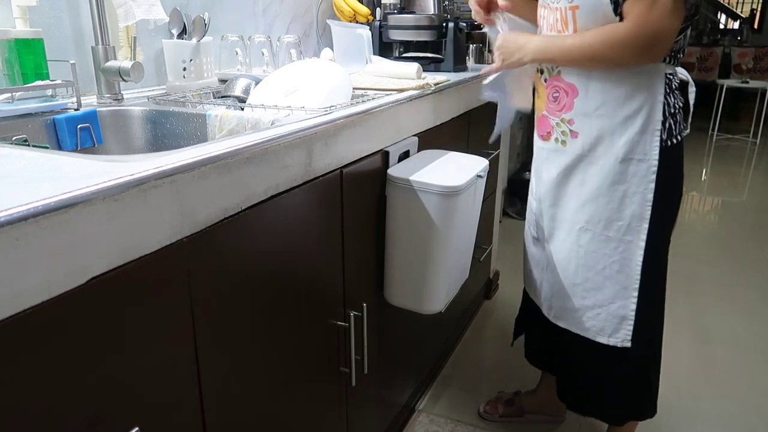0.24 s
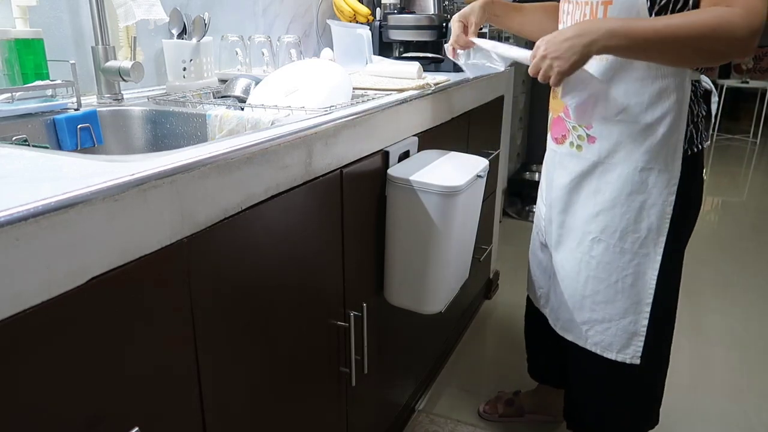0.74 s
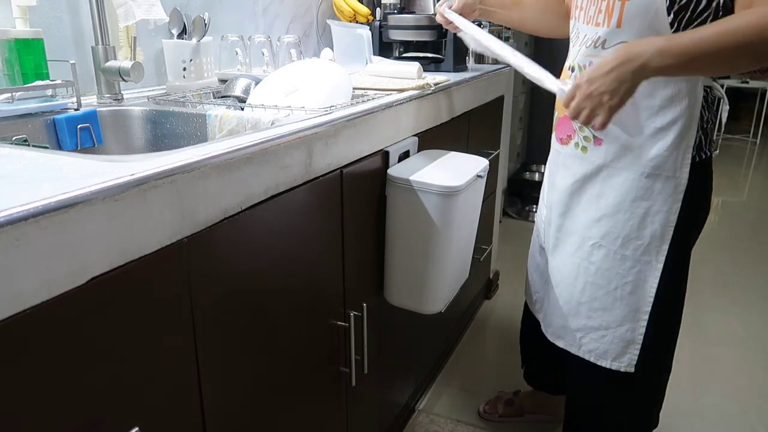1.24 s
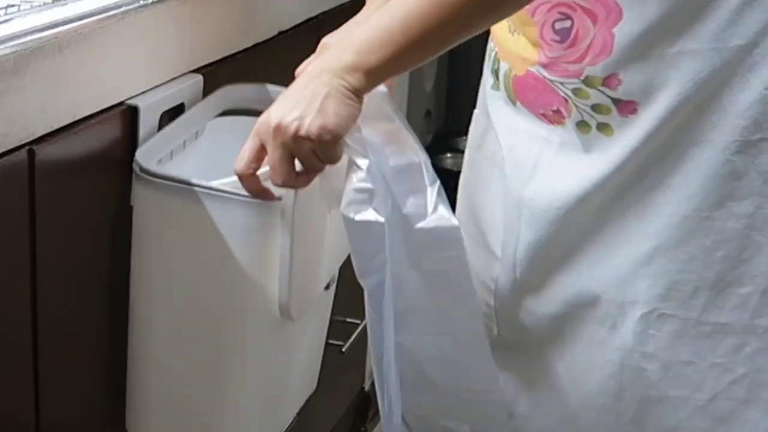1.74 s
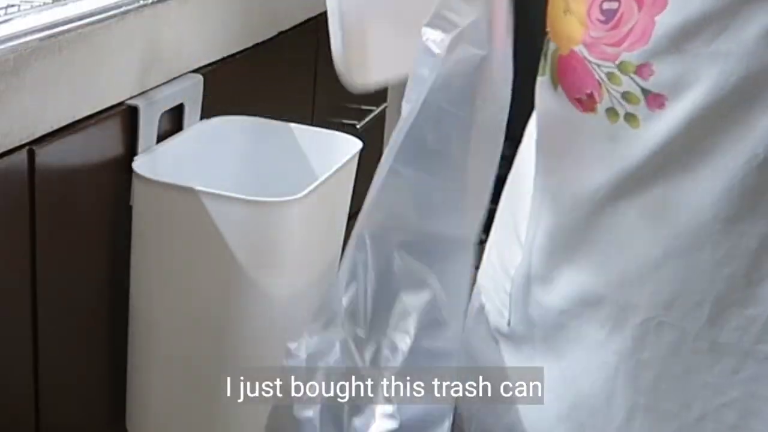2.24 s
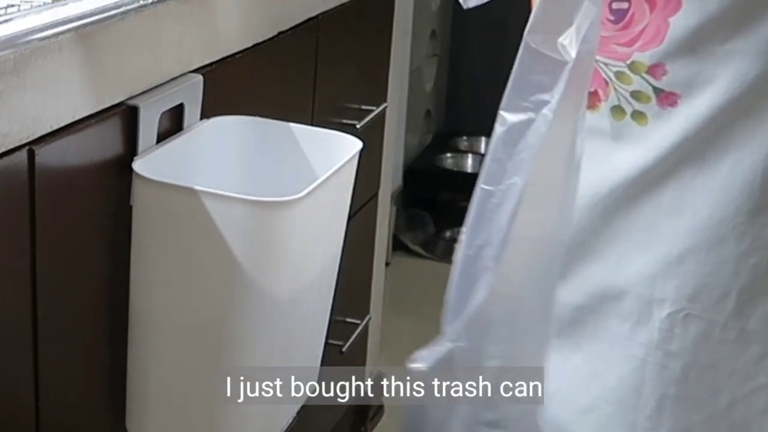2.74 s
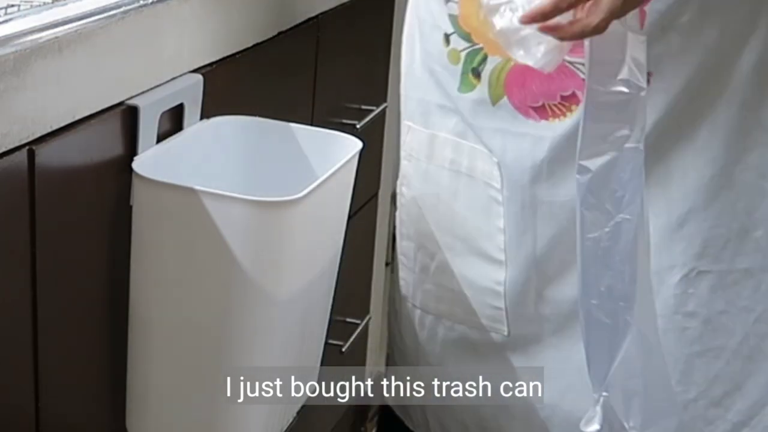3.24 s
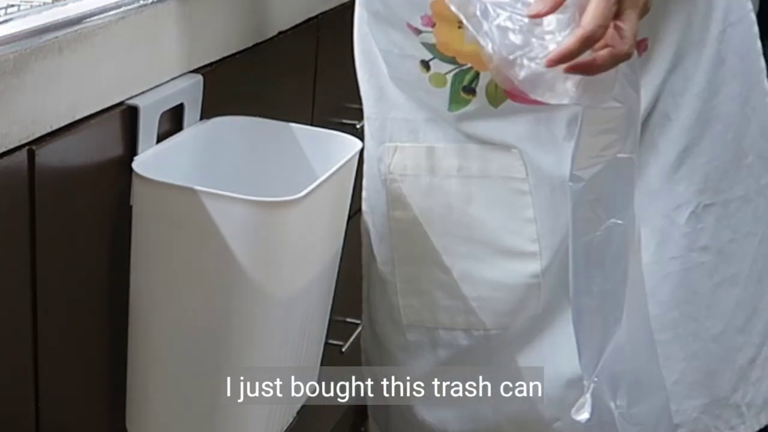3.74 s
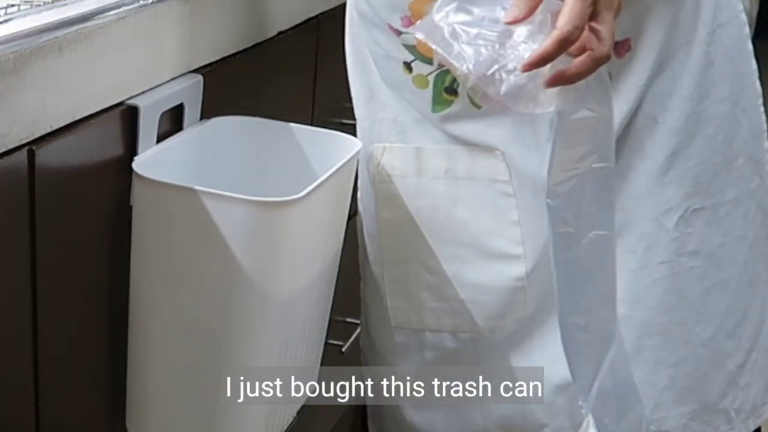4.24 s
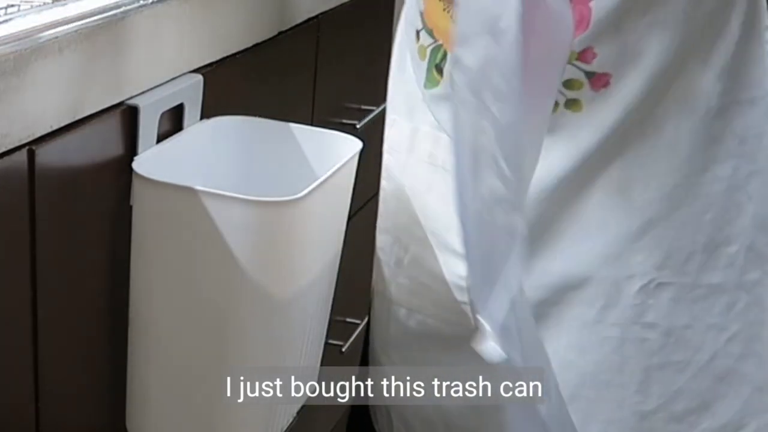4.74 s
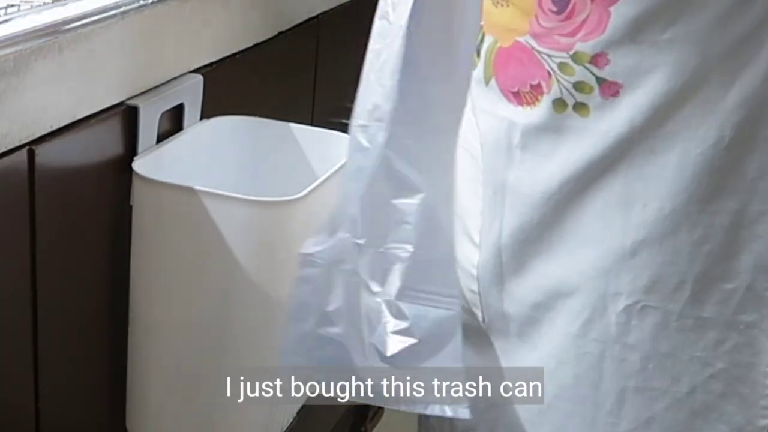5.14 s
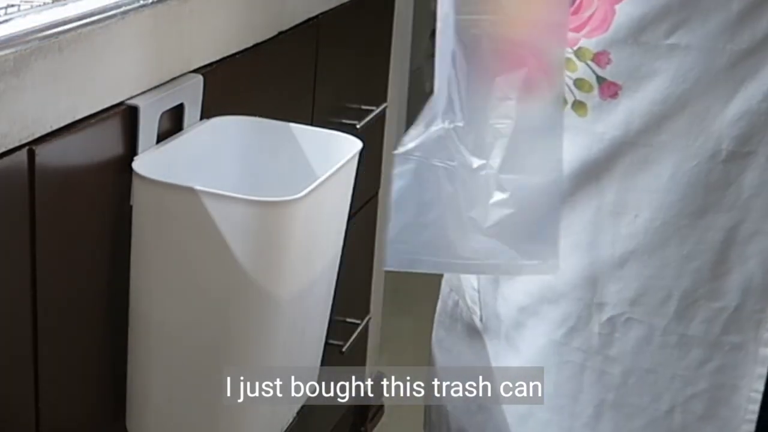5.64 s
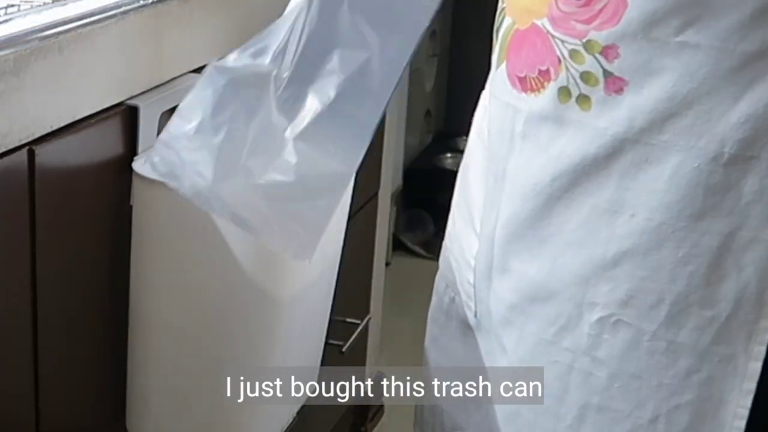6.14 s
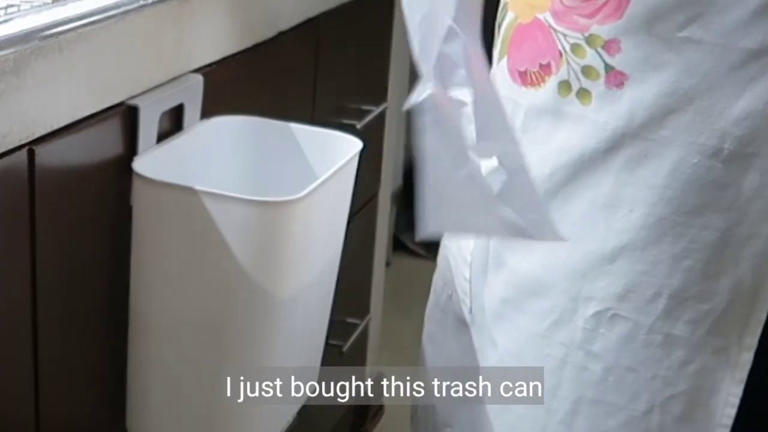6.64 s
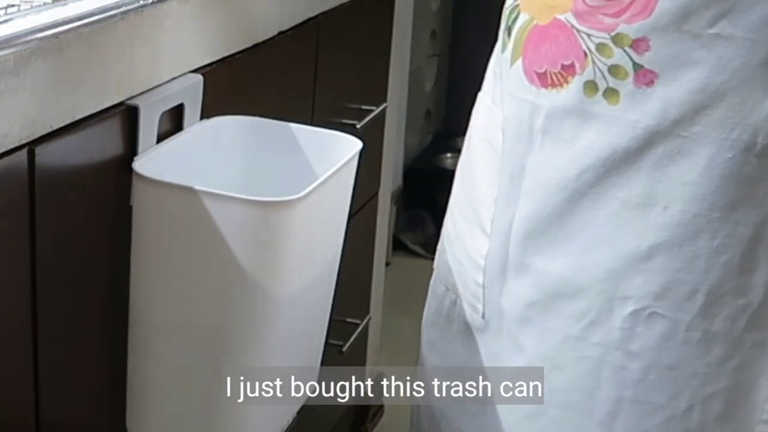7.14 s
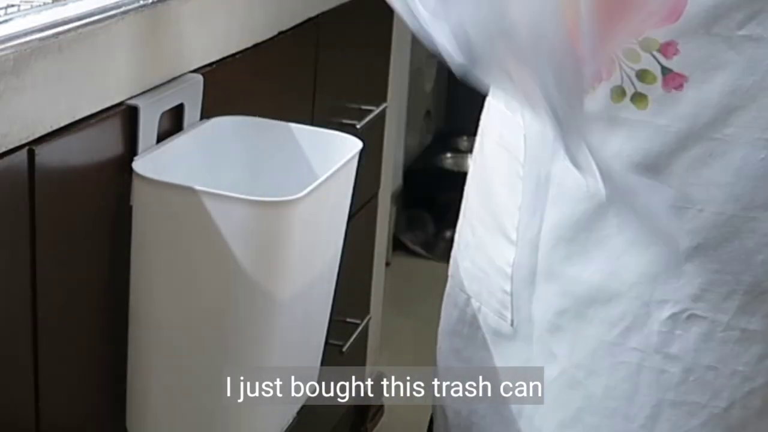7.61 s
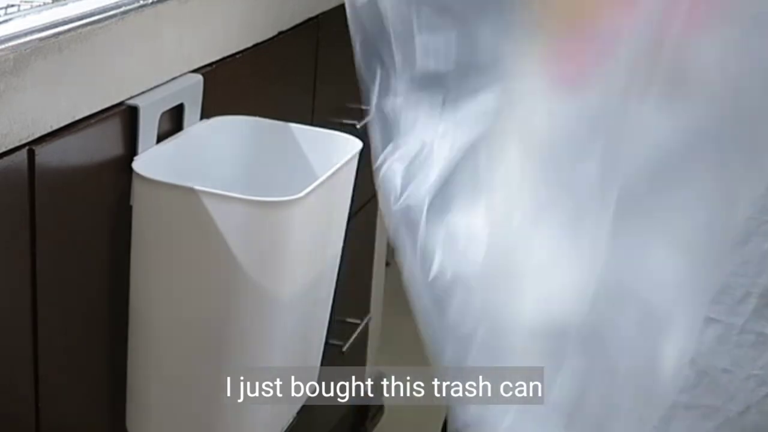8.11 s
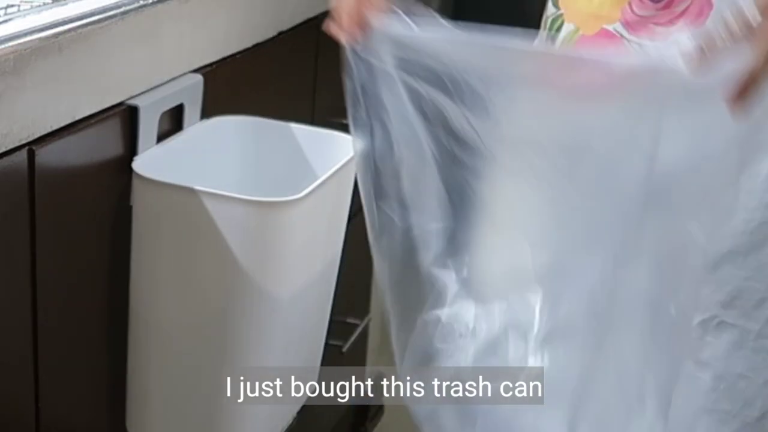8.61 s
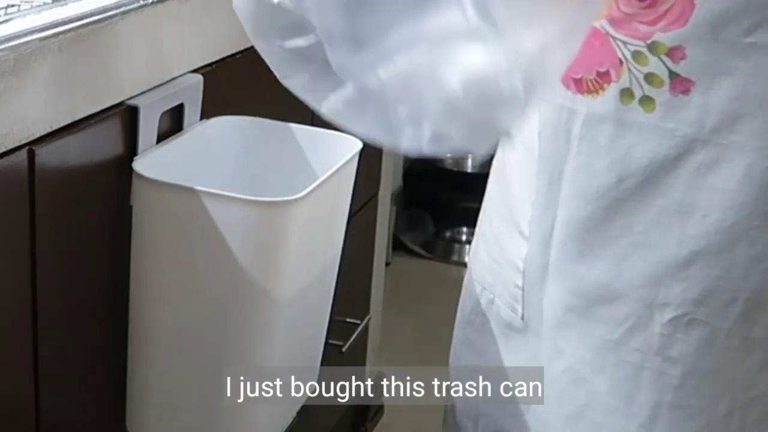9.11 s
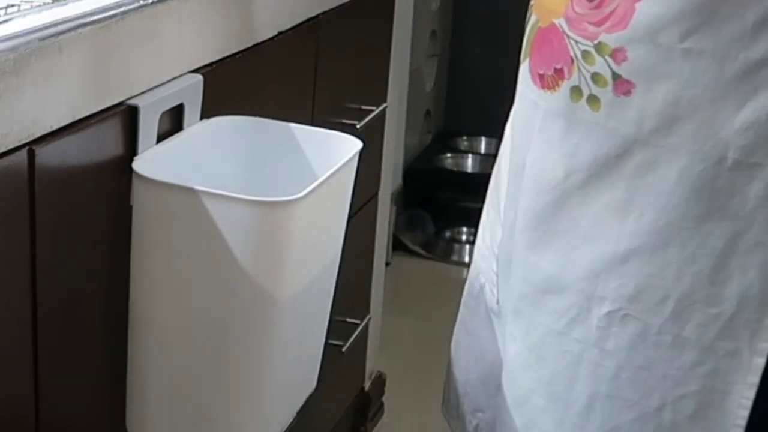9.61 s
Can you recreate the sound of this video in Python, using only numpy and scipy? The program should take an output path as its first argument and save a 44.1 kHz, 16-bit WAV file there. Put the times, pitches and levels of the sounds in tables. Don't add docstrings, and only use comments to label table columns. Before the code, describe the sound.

Crisp plastic film rustling in a hard kitchen, a few booming hollow knocks midway, then bigger flapping shakes over a low fridge hum.

```python
import sys
import numpy as np
from scipy import signal
from scipy.io import wavfile
from scipy.ndimage import uniform_filter1d

SR = 44100
rng = np.random.default_rng(int(sys.argv[2]) if len(sys.argv) > 2 else 0)


def rack_gain(trim_db):
    fader = np.asarray(trim_db, float)
    return 10 ** (fader / 20)


def wav_record(signal):
    frames = np.transpose(np.atleast_2d(signal))
    bounded = np.clip(frames, -1, 1)
    quanta = np.round(bounded * 32767).astype(np.int16)
    wavfile.write(sys.argv[1], SR, quanta)


N = 435266


def unit(x):
    return x / np.sqrt(np.mean(x ** 2, axis=-1, keepdims=True) + 1e-20)


def at_hz(points, hz):
    table_hz, table_db = np.transpose(points)
    return np.interp(np.log(hz), np.log(table_hz), table_db)


def drift(rate):
    r = np.exp(-80 * np.pi * rate / SR)
    slow = signal.lfilter([1], [1, -2 * r, r * r], rng.standard_normal(N // 40 + 2002))[2000:]
    return np.interp(np.arange(N) / 40, np.arange(len(slow)), unit(slow))


def band(x, low_hz, high_hz, order=2):
    return signal.sosfilt(signal.butter(order, [low_hz, high_hz], "band", fs=SR, output="sos"), x)


def ring(start_s, level_db, hz, t60, soft_s):
    first, last = int(start_s * SR), int((start_s + 1.5 * t60) * SR)
    t = np.maximum(np.arange(N) / SR - start_s, 0)[first:last]
    out = np.zeros(N)
    swell = 1 - np.exp(-t / soft_s)
    out[first:first + len(t)] = rack_gain(level_db - 60 * t / t60) * swell * np.sin(2 * np.pi * hz * t)
    return out


def resonance(x, hz, width_hz):
    r = np.exp(-np.pi * width_hz / SR)
    return signal.lfilter([(1 - r * r) / 2, 0, (r * r - 1) / 2], [1, -2 * r * np.cos(2 * np.pi * hz / SR), r * r], x)


def kitchen(x, wet_db, side_direct_db):
    t = np.arange(int(.6 * SR)) / SR
    fade = rack_gain(-60 * t / 0.42) * (t > .003)
    tails = unit(rng.standard_normal((2, len(t))) * fade) / np.sqrt(len(t)) * rack_gain(wet_db)
    slope = rack_gain(side_direct_db)
    tails[:, :3] = [[0, 1, 0], [slope, 0, -slope]]
    return signal.fftconvolve(x[None], tails, axes=1)[:, :N]


BANDS = 28 * 2 ** (np.arange(21) * .455)


def coloured(mid_side, gain_db, apart):
    out = 0
    for k, (low, high) in enumerate(zip(BANDS, BANDS[1:])):
        hz = np.sqrt(low * high)
        mid, side = band(mid_side[k % 2], low, high)
        side = side * rack_gain(at_hz(apart, hz))
        out = out + rack_gain(gain_db(hz)) * np.array([mid + side, mid - side])
    return out


# peak_s, crackle_db, rise_s (per 10 dB), fall_s (per 10 dB), crispness_db
UNFOLDING_MOVES = [(.13, -52, .03, .2, -15), (.49, -34.5, .105, .23, -16.5), (.77, -37.5, .035, .27, -9),
                   (1.01, -44, .15, .25, -15), (1.25, -47, .08, .4, -17), (1.41, -36, .006, .02, -30),
                   (1.53, -48, .15, .08, -11), (1.67, -42.5, .025, .04, -11), (1.78, -55, .02, .2, -13),
                   (1.83, -43, .03, .065, -30), (1.96, -47.5, .07, .2, -25), (2.07, -48, .04, .08, -12),
                   (2.105, -50, .03, .025, -10), (2.27, -52, .05, .12, -12), (2.75, -57, .05, .25, -13),
                   (3.48, -60, .02, .06, -11), (3.73, -57, .03, .03, -12), (3.87, -55, .05, .15, -13),
                   (4.76, -57, .3, .15, -4)]
OPENING_MOVES = [(5.01, -38, .075, .25, -7), (5.24, -33.5, .03, .03, -22), (5.34, -37.5, .04, .09, -10),
                 (5.57, -39, .3, .09, -8), (5.76, -36, .12, .17, -10), (6.12, -34, .14, .25, -7),
                 (6.24, -38, .08, .06, -7), (6.3, -29, .04, .1, -14), (6.57, -33.5, .05, .1, -9),
                 (6.63, -27.5, .035, .08, -6), (6.88, -39, .35, .12, -7), (7.06, -41, .08, .2, -7),
                 (7.16, -29, .07, .085, -11)]
SHAKING_MOVES = [(7.42, -31, .03, .2, -11), (7.48, -27, .09, .09, -8), (7.525, -27, .06, .03, -7.5),
                 (7.62, -31.5, .1, .15, -8), (7.69, -33, .03, .08, -10), (7.82, -37, .1, .06, -13),
                 (8.022, -15.5, .045, .06, -12), (8.25, -27, .19, .055, -8.5), (8.38, -34, .2, .4, -10),
                 (8.53, -19, .065, .12, -12), (8.58, -20.5, .06, .06, -11), (8.73, -28, .2, .09, -11),
                 (8.93, -37, .3, .4, -9), (9.12, -31, .08, .12, -10), (9.22, -28, .12, .057, -9),
                 (9.41, -41, .15, .05, -10), (9.57, -34, .06, 0.9, -9), (9.748, -22, .018, .1, -11),
                 (9.79, -20, .05, .046, -14)]
# start_s, steady_rustle_db, billow_db (of a move against its crackle)
SHEET_AT_REST = [(0, -52, -10), (.3, -54, -12), (1.2, -58, -7), (2.3, -58.5, -7), (3.4, -62, -5),
                 (4.45, -54, -8), (5.4, -52, -19), (6.1, -50, -13), (7.3, -48, -13), (8.6, -47, -11),
                 (9.4, -49, -15), (9.66, -49, -14), (9.75, -49, -2), (9.87, -49, -13)]


def handling():
    t = np.arange(0, N, 32) / SR
    start_s, rest_db, billow_db = np.transpose(SHEET_AT_REST)
    rest_db, billow_db = np.interp(t, start_s, rest_db), np.interp(t, start_s, billow_db)
    all_moves = np.vstack([UNFOLDING_MOVES, OPENING_MOVES, SHAKING_MOVES])
    peak_s, peak_db, rise_s, fall_s, crisp_db = all_moves.T[:, :, None]
    drop_db = 10 * np.maximum((peak_s - t) / rise_s, (t - peak_s) / fall_s)
    moves = rack_gain(2 * (peak_db - drop_db))
    stir = rest_db + 54
    crackle = moves.sum(axis=0) + rack_gain(2 * rest_db)
    crisp = (moves * rack_gain(2 * crisp_db)).sum(axis=0) + rack_gain(2 * (rest_db - 17 + .9 * stir))
    billow = moves.sum(axis=0) * rack_gain(2 * billow_db) + rack_gain(2 * (rest_db - 1 - .5 * stir))
    return [np.interp(np.arange(N) / SR, t, 10 * np.log10(power)) for power in (crackle, crisp, billow)]


def creases(per_s, spread_db, clump_db):
    part = rng.integers(0, 3, N)
    born = rng.random(N) < per_s / SR
    size_db = spread_db * np.minimum(rng.exponential(1, N), 4) + clump_db * drift(57)
    clicks = born * rack_gain(size_db) * rng.choice([-1, 1], N)
    return unit(sum(kitchen(clicks * (part == k), wet_db=1.5, side_direct_db=-12) for k in range(3)))


def patches(per_s, width_hz):
    pitches, dealt = np.geomspace(1200, 3500, 16), rng.integers(0, 16, N)
    snaps = (rng.random(N) < per_s / SR) * rack_gain(4.2 * np.minimum(rng.exponential(1, N), 3)) + 1e-18
    rings = sum(resonance(snaps * (dealt == k), hz, width_hz) for k, hz in enumerate(pitches))
    return unit(kitchen(rings, wet_db=-2.0, side_direct_db=-6)[0])


# pitch_hz, level_db (per Hz)
FILM_TONE = [(71, -22), (120, -9.5), (173, -4.5), (204, -4.5), (390, -2.5), (574, -2.5), (844, -5),
             (954, -7), (1290, -6), (2430, 1.5), (5700, -9), (12300, -16.5), (15400, -16)]
# pitch_hz, side_minus_mid_db
FILM_WIDTH = [(60, -20), (110, -25), (200, -48), (380, -42.5), (700, -19), (1290, -14), (2380, -22.5),
              (4400, -2), (8120, 2.5), (15000, 3.5)]


def bag():
    crackle, crisp, billow = handling()
    trains = [creases(per_s=2500, spread_db=4.0, clump_db=2.3) for _ in range(2)]
    fold_db = crackle - 5 + np.minimum(crackle + 48, 0)
    folds = rack_gain(fold_db) * patches(per_s=120, width_hz=110)

    def gain_db(hz):
        high = np.interp(np.log(hz), np.log([2500, 8000]), [0, 1])
        low = np.interp(np.log(hz), np.log([500, 1800]), [1, 0])
        level = (1 - high - low) * crackle + high * (crisp + 9) + low * (billow + 11)
        return at_hz(FILM_TONE, hz) + level + 12.0 + 0.97 * drift(31)
    return coloured(trains, gain_db, FILM_WIDTH) + folds


# pitch_hz, width_hz, level_db
BIN_AIR = [(563, 44, -15.5), (971, 22.5, -5.5), (1140, 30, -13.5), (1528, 45, -13.5)]
# start_s, level_db
NEAR_BIN_MOUTH = [
    (0, -6),
    (4.9, -4),
    (5.1, 15),
    (6.5, 1),
    (7.5, -6),
    (8.0, -9),
    (9.87, 7.5),
]


def bin_echo(film):
    near = rack_gain(np.interp(np.arange(N) / SR, *np.transpose(NEAR_BIN_MOUTH)))
    crackle = film.mean(axis=0)
    return near * sum(rack_gain(db + 7.5) * resonance(crackle, hz, width_hz) for hz, width_hz, db in BIN_AIR)


# pitch_hz, level_db (per Hz)
HUM_TONE = [(15, -38), (25, -12), (59, -0.5), (125, -5.5), (151, -16), (188, -3), (297, -9), (358, 0),
            (432, -13), (468, -17.5), (720, -14), (846, -24.5), (1570, -14), (1950, -25), (15400, -52)]
# pitch_hz, side_minus_mid_db
HUM_WIDTH = [(60, -31), (110, -13.5), (200, -7.5), (380, -7), (700, -0.5), (1290, -9.5), (2380, -2),
             (4400, -2), (8120, 0), (15000, 5)]
# start_s, level_db
LOW_HUM_LEVEL = [(0, 1.5), (1, 0.5), (2.3, -0.5), (4, -1), (6.8, -1), (8.4, 2), (8.6, -9), (9.87, -9.5)]
# pitch_hz, level_db (rms)
FRIDGE_TONES = [(60, -70), (120, -56), (357, -55), (415, -63), (560, -65), (715, -62)]


def hum():
    t = np.arange(N) / SR
    swell_db = np.interp(t, *np.transpose(LOW_HUM_LEVEL))

    def gain_db(hz):
        return at_hz(HUM_TONE, hz) + 0.46 * drift(3.4) + swell_db * (hz < 230)
    noise = coloured(rng.standard_normal((2, 2, N)), gain_db, HUM_WIDTH)
    tones = sum(rack_gain(db + 5.0 * drift(10)) * np.sin(2 * np.pi * hz * t) for hz, db in FRIDGE_TONES)
    return rack_gain(-47) * unit(noise) + tones


# start_s, pitch_hz, level_db
FAR_MOTOR = [
    (0.0, 101, -43),
    (0.086, 107, -37),
    (0.1, 105, -56),
    (0.12, 102, -37),
    (0.312, 90.0, -42),
    (0.638, 93.0, -50),
    (0.708, 98.6, -50),
    (0.9, 92.5, -53),
]


def drone():
    t = np.arange(N) / SR
    start_s, hz, level_db = np.transpose(FAR_MOTOR)
    fade_db = -60 * np.maximum(t - start_s[-1], 0) / .4
    turns = np.cumsum(np.interp(t, start_s, hz)) / SR
    return rack_gain(np.interp(t, start_s, level_db) + fade_db + 3) * np.sin(2 * np.pi * turns)


# start_s, peak_db, pitch_hz
CREASE_TICKS = [(0.0312, -34.5, 1940), (0.0597, -35.5, 2630), (0.0705, -39.3, 2020), (0.1008, -36.1, 2200),
                (0.108, -29.2, 2840), (0.1192, -30.4, 2970), (0.1745, -34.3, 2500), (0.2281, -38.5, 1590),
                (0.2873, -40.5, 2540), (0.3196, -34.4, 2330), (0.3539, -31.7, 3190), (0.3839, -29.6, 2580),
                (0.4035, -29.8, 2280), (0.4306, -26.6, 2670), (0.584, -26.5, 2020), (0.5902, -26.3, 1980),
                (0.6751, -27.5, 2410), (0.6923, -30.0, 2840), (0.7037, -31.6, 3140), (0.7538, -25.5, 2370),
                (0.7611, -24.1, 2450), (0.8451, -28.0, 2540), (0.8522, -27.2, 2410), (0.9284, -27.3, 2630),
                (0.9489, -29.1, 2410), (0.9563, -30.5, 2800), (0.9882, -26.9, 2630), (1.0198, -25.0, 2540),
                (1.0252, -30.2, 1720), (1.0488, -29.2, 2200), (1.0816, -31.1, 1980), (1.1841, -27.9, 1890),
                (1.2413, -34.9, 2500), (1.2923, -33.1, 1640), (1.3034, -34.9, 1420), (1.3621, -34.9, 2760),
                (1.409, -21.8, 2330), (1.4151, -27.1, 2540), (1.4241, -31.6, 2280), (1.4308, -31.3, 2280),
                (1.4917, -32.6, 2630), (1.5181, -30.2, 2540), (1.571, -35.2, 1810), (1.6039, -38.8, 2370),
                (1.8198, -31.8, 2070), (1.8335, -32.6, 1810), (1.8427, -36.2, 1810), (1.8662, -37.5, 1770),
                (1.9988, -35.0, 2280), (2.0116, -33.8, 2240), (2.2677, -39.0, 1510), (2.5203, -43.6, 2540),
                (2.7686, -41.3, 2450), (3.161, -44.8, 1590), (3.1793, -44.7, 1680), (3.2623, -44.5, 1550),
                (3.6756, -44.6, 1720), (3.7249, -41.4, 1810), (4.7046, -37.0, 2020), (4.8839, -38.0, 2200),
                (4.9247, -34.4, 2450), (5.1007, -27.9, 2450), (5.224, -23.3, 1680), (5.2326, -21.4, 1460),
               (5.3373, -24.1, 2450), (5.5036, -28.0, 2580), (5.7686, -25.1, 1940), (5.7762, -22.7, 3060),
               (5.8194, -29.0, 2410), (5.8843, -27.8, 1770), (6.0137, -25.9, 2710), (6.1028, -23.9, 2240),
               (6.1147, -22.3, 2500), (6.2782, -22.4, 2710), (6.3675, -19.5, 3060), (6.5282, -26.4, 2630),
               (6.5456, -25.2, 2800), (6.6231, -19.2, 2500), (6.7514, -26.0, 2580), (6.816, -26.3, 2800),
               (6.8851, -26.7, 2760), (7.0367, -28.7, 2840), (7.0704, -27.2, 2930), (7.1404, -20.2, 2580),
               (7.3014, -28.1, 2630), (7.3819, -26.0, 3190), (7.4135, -18.6, 2540), (7.4509, -16.2, 3750),
               (7.4983, -15.6, 1720), (7.6147, -19.5, 2110), (7.6228, -19.2, 2710), (7.6974, -18.3, 1720),
               (7.7489, -24.5, 2410), (7.9892, -13.2, 2840), (7.9972, -11.5, 2410), (8.0135, -9.5, 2930),
               (8.0258, -4.9, 2410), (8.057, -9.4, 2280), (8.2625, -18.4, 1850), (8.2696, -17.4, 1940),
               (8.4817, -15.6, 2540), (8.5198, -9.6, 2630), (8.5349, -8.9, 2410), (8.5748, -8.7, 2020),
               (8.5828, -10.3, 2330), (8.602, -12.5, 1980), (8.6672, -19.1, 2070), (8.7752, -19.0, 1980),
               (8.8035, -23.8, 2370), (8.8443, -25.4, 2410), (8.854, -24.7, 2840), (8.8674, -25.9, 2630),
               (9.0314, -24.3, 2840), (9.097, -20.5, 2330), (9.1282, -18.4, 2110), (9.2664, -23.4, 1980),
               (9.3041, -26.1, 2410), (9.5272, -28.9, 2670), (9.7733, -11.8, 1640), (9.8173, -16.2, 2450)]


def ticks():
    rows = np.array(CREASE_TICKS)
    out, t = np.zeros(N), np.arange(400) / SR
    edges = band(rng.standard_normal((len(rows), 400)), 2200, 6000)
    for (start_s, peak_db, hz), edge in zip(rows, edges):
        snap = rack_gain(1.5 - 60 * t / .009) * np.sin(2 * np.pi * hz * t) + rack_gain(-60 * t / .006) * edge
        out[int(start_s * SR):int(start_s * SR) + 400] += rack_gain(peak_db) * snap
    return out


# start_s, peak_db, pitch_hz, t60_s (time to die by 60 dB)
HOLLOW_BUMPS = [(.06, -38, 82, .2), (0.498, -42, 204, 0.34), (1.822, -31, 255, 0.12),
                (1.83, -32, 320, 0.18), (1.84, -33.5, 192, 0.13), (1.85, -34, 400, .1),
                (1.875, -30, 330, .08), (1.865, -29, 250, .12), (2.059, -38, 335, 0.16),
                (3.93, -22, 228, .3), (4.116, -17, 192, .15), (4.121, -26.5, 46.6, .5),
                (4.135, -21, 255, .15), (9.741, -31, 107, 0.17), (9.752, -26, 156, .15)]
# start_s, peak_db, pitch_hz, t60_s
FOLD_TWANGS = [(.425, -36, 1790, .15), (.49, -35, 2520, .12), (.56, -37, 1815, .2), (1.407, -30, 3390, .06),
               (5.243, -30, 1165, .12), (5.228, -32, 575, .08), (6.286, -28, 1900, .07),
               (6.291, -24, 945, .08), (6.293, -24, 3300, .06), (6.308, -29, 1240, .06),
               (6.357, -23, 945, .1), (6.36, -25, 2980, .07)]


def bumps():
    return sum(ring(start_s, peak_db, hz, t60, 0.0018) for start_s, peak_db, hz, t60 in HOLLOW_BUMPS + FOLD_TWANGS)


# start_s, peak_db, pitch_hz, t60_s, rasp_db
CREASE_POPS = [(0.106, -38, 2820, 0.044, -5), (0.49, -28, 1860, 0.062, 4), (0.588, -27, 1810, 0.055, -12),
               (0.75, -30, 2550, 0.065, -1), (0.838, -28, 2510, 0.05, -8), (1.184, -31.5, 1680, 0.066, -1),
               (1.291, -33, 1210, 0.053, -18), (1.408, -28, 2410, 0.05, -16), (1.429, -35, 2370, 0.042, -6),
               (1.515, -35, 2440, 0.045, -6), (1.82, -31, 1800, 0.054, -19), (2.011, -34.5, 2520, 0.05, -2),
               (5.223, -28, 1390, 0.042, -13), (5.23, -19, 1430, 0.05, -16), (5.249, -31, 1160, 0.056, -6),
               (5.334, -26, 3440, 0.05, -15), (5.378, -21, 2350, 0.029, -10), (6.114, -23, 2420, 0.05, -6),
               (6.129, -26, 2550, 0.046, 0), (6.293, -20, 970, 0.05, -12), (6.31, -22, 2530, 0.05, 4),
               (6.363, -21, 2940, 0.068, -1), (6.375, -19, 2420, 0.041, -2), (8.572, -13.5, 1990, 0.12, -5)]


def pops():
    out, noise = np.zeros(N), rng.standard_normal((len(CREASE_POPS), 4000))
    t = np.arange(4000) / SR
    for (start_s, peak_db, hz, t60, rasp_db), slips in zip(CREASE_POPS, noise):
        patch = .6 * unit(resonance(slips, hz, width_hz=77)) + 1.1 * np.sin(2 * np.pi * hz * t)
        rasp = rack_gain(rasp_db) * unit(band(slips, 900, 5000))
        shape = rack_gain(peak_db - 4 - 60 * t / t60) * (1 - np.exp(-t / 0.0014))
        out[int(start_s * SR):int(start_s * SR) + len(t)] += shape * (patch + rasp)
    return out


# start_s, cabinet_boom_db, lid_ring_db, rim_ring_db, crack_db
LID_KNOCKS = [
    (3.896, -4.5, -33, -31, -19.5),
    (3.943, -10, -52, -57, -50),
    (3.984, -27.5, -42, -34, -22),
    (3.989, -30, -18.5, -40, -17),
    (4.021, -17, -40, -54, -32),
    (4.077, -35, -38, -45, -30),
    (4.114, -9, -28, -11.5, -14),
    (4.155, -7, -40, -30, -35),
    (4.241, -26, -37.5, -30, -25.5),
    (4.279, -15.5, -47, -50, -56),
]
# pitch_hz, level_db, t60_s
CABINET_RINGS = [(132, -4, 0.033), (144.2, -8, 0.49), (164.8, 0.5, 0.12), (210.9, -4, 0.12),
                 (298, -10.5, 0.078)]
LID_RINGS = [(447, 0, 0.25), (590, -6, 0.13), (795, -3, 0.5), (840, 1, 0.07), (948, 0, 0.18),
             (1290, 1, 0.074), (1675, -6, 0.1), (2226, -3, .05), (3200, -7, .07)]
RIM_RINGS = [(535, 2, 0.14), (595, -4, .25), (710, -1, 0.09), (877, -6, 0.054), (953, -1, 0.09),
             (1100, -6, .08), (1210, -12, .15), (1650, -8, 0.16), (2140, 4, 0.031), (2750, -6, .05),
             (3300, -16, .07)]


def knocks():
    out, t = np.zeros(N), np.arange(N) / SR
    crack, tail, click = np.zeros((3, N))
    rattle = [1 + .22 * drift(45) for _ in range(5)]
    for start_s, boom_db, lid_db, rim_db, crack_db in LID_KNOCKS:
        bodies = [(CABINET_RINGS, boom_db - 4, .005), (LID_RINGS, lid_db - 2.5, .002), (RIM_RINGS, rim_db - 6.5, .002)]
        for body, share_db, soft_s in bodies:
            for hz, mode_db, t60 in body:
                out += rattle[int(hz) % 5] * ring(start_s, share_db + mode_db, hz, t60, soft_s)
        since = np.clip(t - start_s, 0, 1)
        crack += rack_gain(crack_db + 2.5 - 60 * since / 0.087) * (1 - np.exp(-since / 0.0027))
        tail += rack_gain(crack_db - 2.5 - 60 * since / 0.41) * (1 - np.exp(-since / 0.0059))
        click += rack_gain(crack_db - 17 - 60 * since / .11) * (since > 0)
    noise = rng.standard_normal((3, N))
    crack = band(crack * noise[0], 600, 3200, order=1)
    tail = band(tail * noise[1], 300, 1800, order=1)
    click = band(click * noise[2], 3000, 7000)
    return band(out + crack + tail, 60, 3600, order=4) + click


def scene():
    hits = kitchen(knocks(), wet_db=-12, side_direct_db=-8)
    mid, side = kitchen(pops() + ticks(), wet_db=-10.5, side_direct_db=-12) + hits
    treble = signal.sosfilt(signal.butter(2, 3000, "high", fs=SR, output="sos"), side)
    side = rack_gain(1.5) * treble + rack_gain(-16) * side
    film = bag()
    return film + bin_echo(film) + np.array([mid + side, mid - side]) + bumps() + drone() + hum()


def roll_off(x):
    return signal.sosfilt(signal.butter(12, 15300, fs=SR, output="sos"), x)


def record(dry):
    level_db = 10 * np.log10(uniform_filter1d(np.mean(dry ** 2, axis=0), 2000) + 1e-12)
    slope = 23.0 * np.arange(N) / SR
    held_db = np.maximum.accumulate(level_db + slope) - slope
    mix = dry * rack_gain(-.1 * np.maximum(held_db + 25, 0))
    return roll_off(mix)


dry = scene()
out = record(dry)
wav_record(out)
```